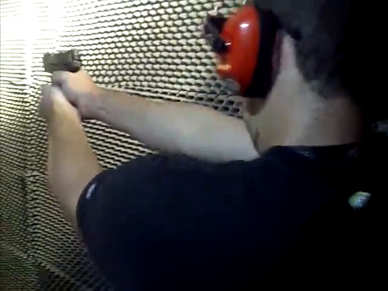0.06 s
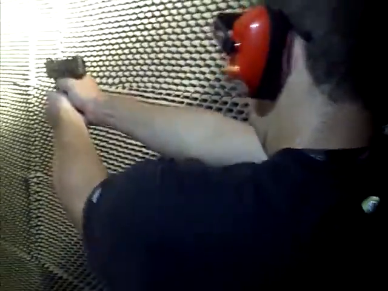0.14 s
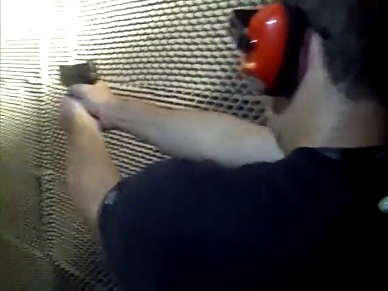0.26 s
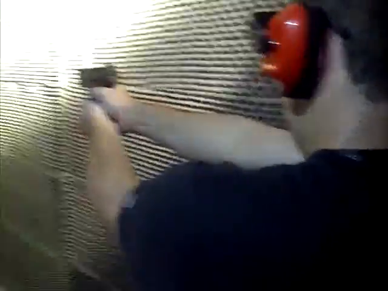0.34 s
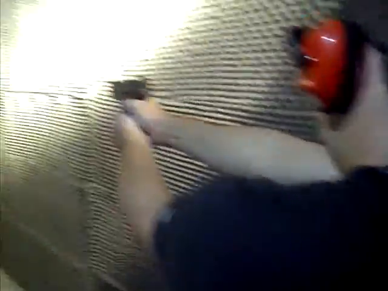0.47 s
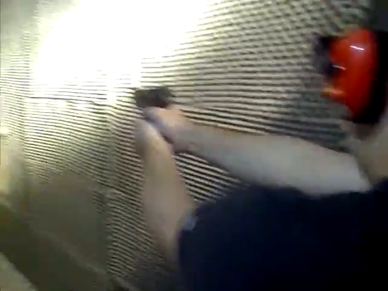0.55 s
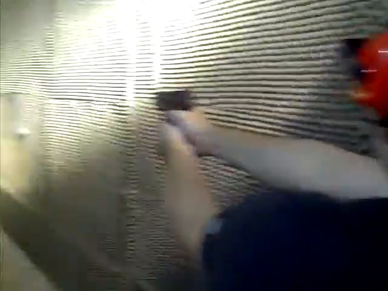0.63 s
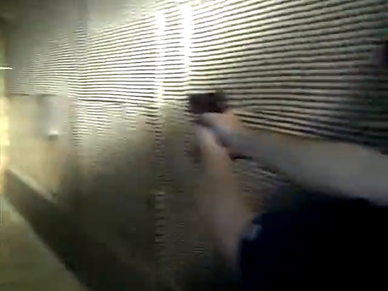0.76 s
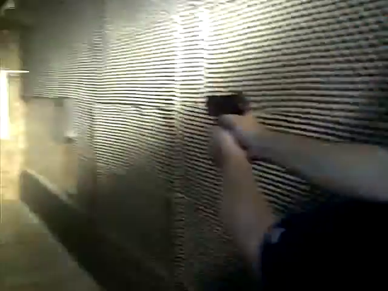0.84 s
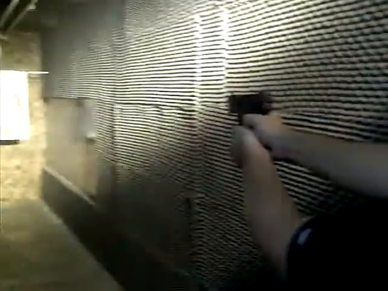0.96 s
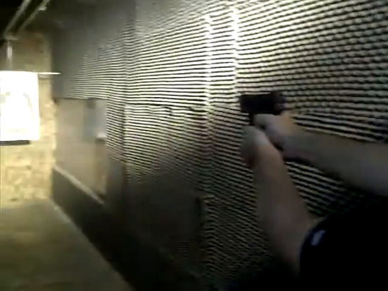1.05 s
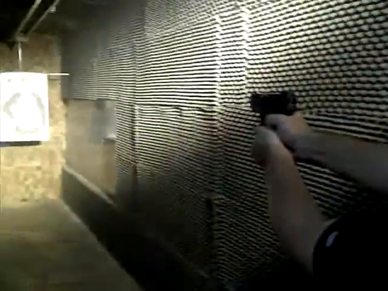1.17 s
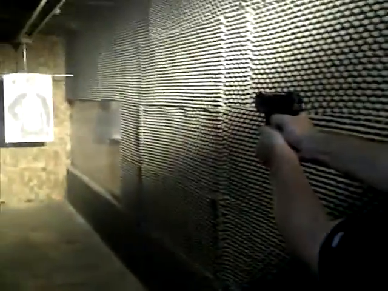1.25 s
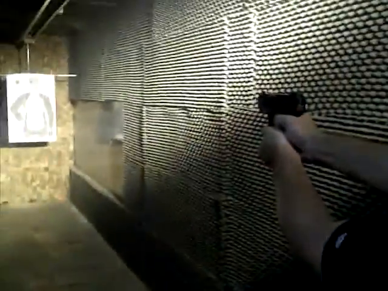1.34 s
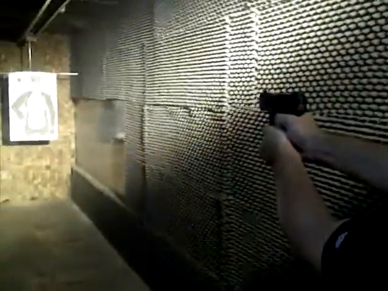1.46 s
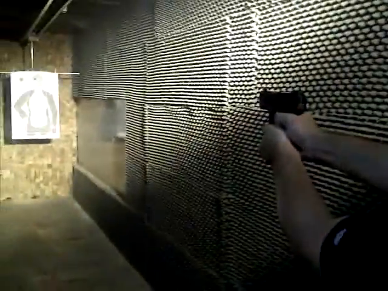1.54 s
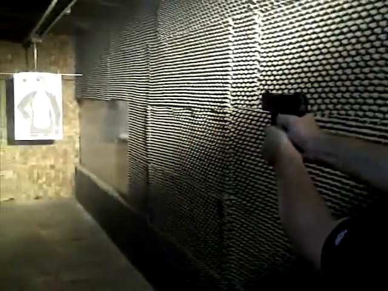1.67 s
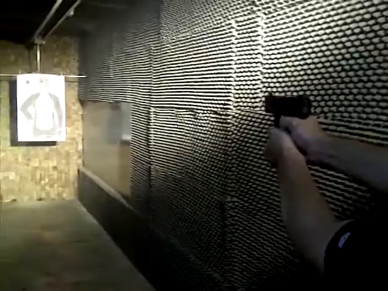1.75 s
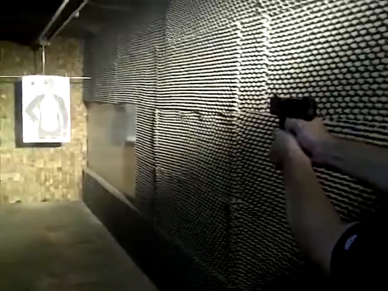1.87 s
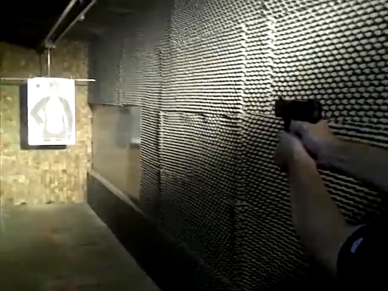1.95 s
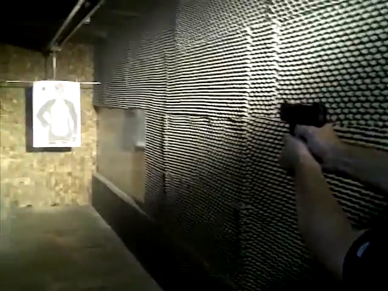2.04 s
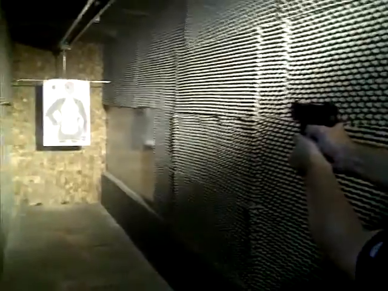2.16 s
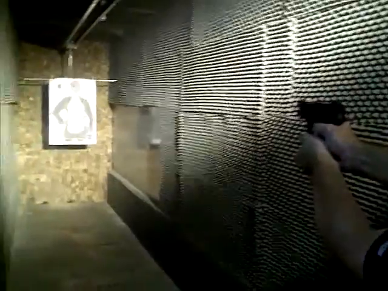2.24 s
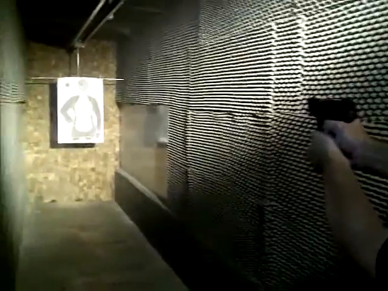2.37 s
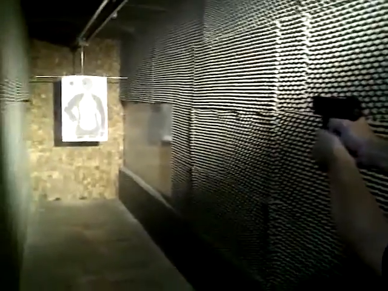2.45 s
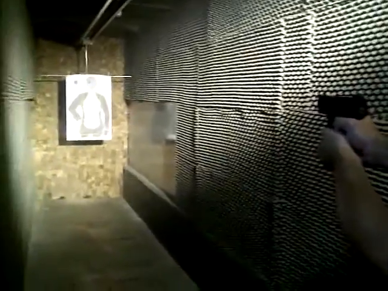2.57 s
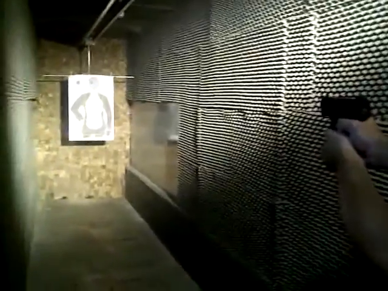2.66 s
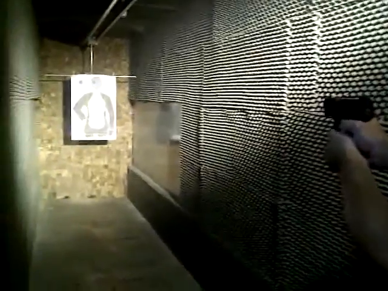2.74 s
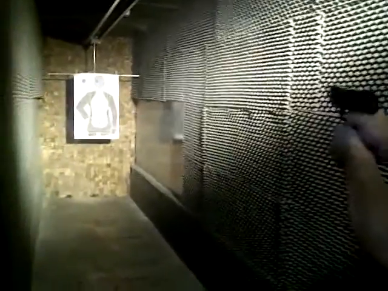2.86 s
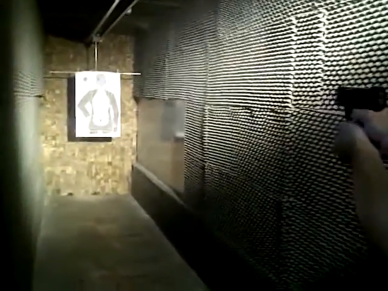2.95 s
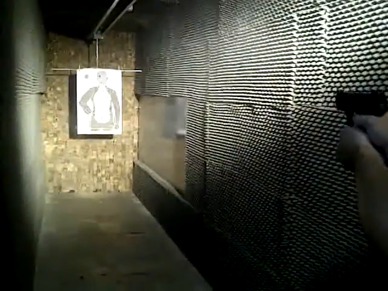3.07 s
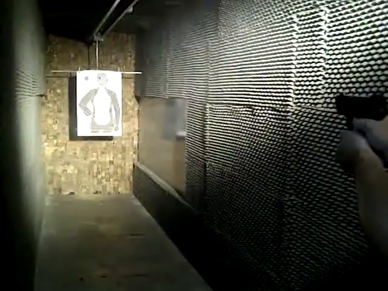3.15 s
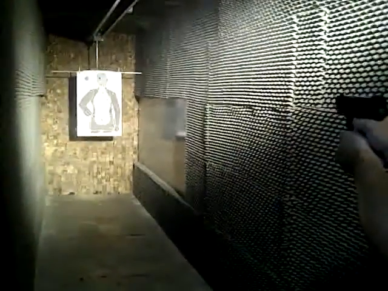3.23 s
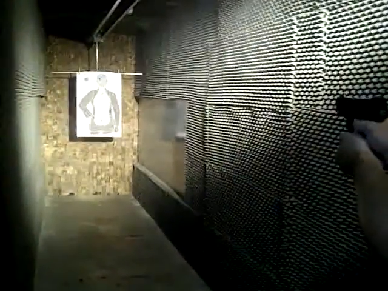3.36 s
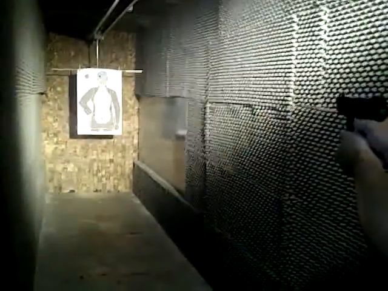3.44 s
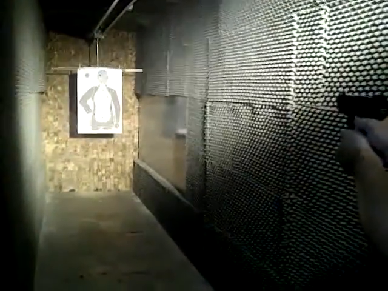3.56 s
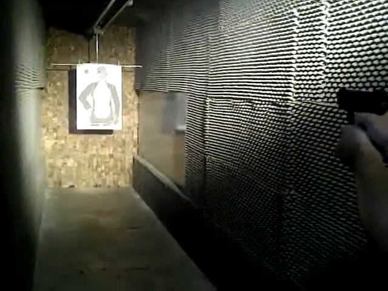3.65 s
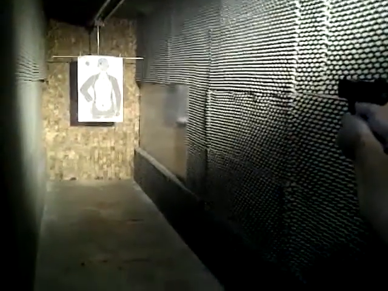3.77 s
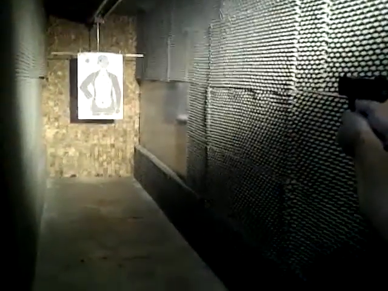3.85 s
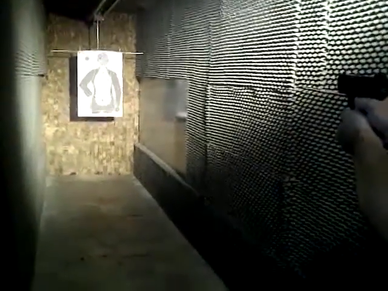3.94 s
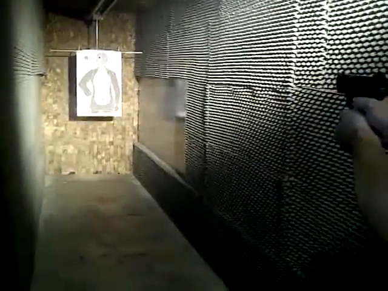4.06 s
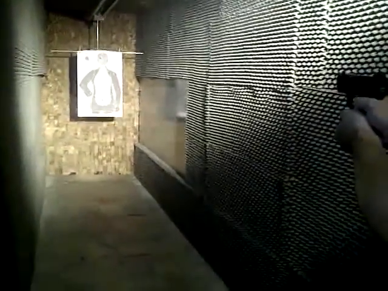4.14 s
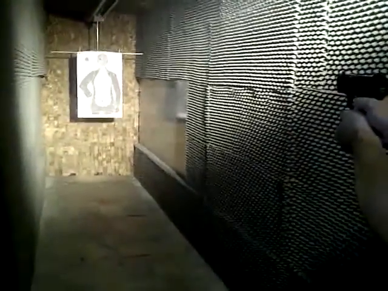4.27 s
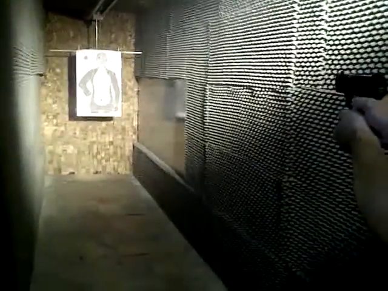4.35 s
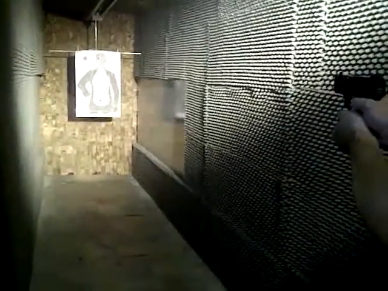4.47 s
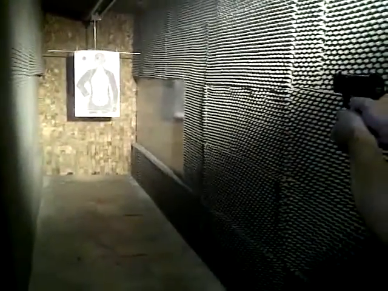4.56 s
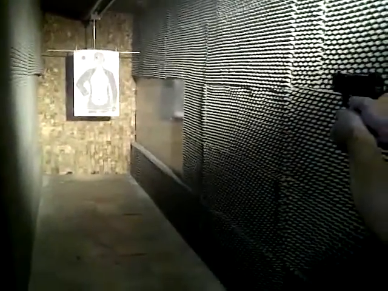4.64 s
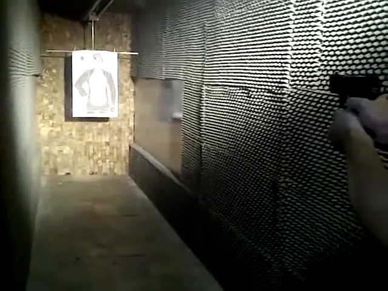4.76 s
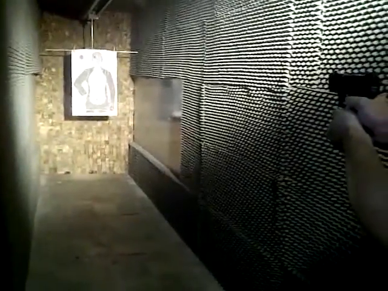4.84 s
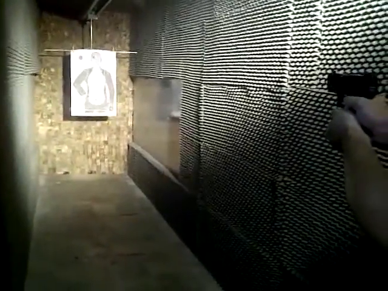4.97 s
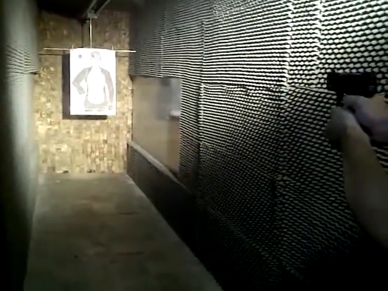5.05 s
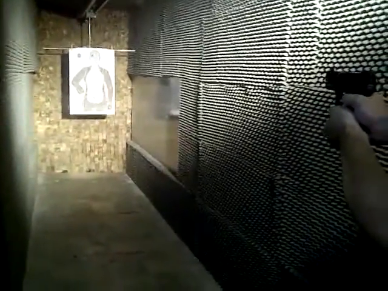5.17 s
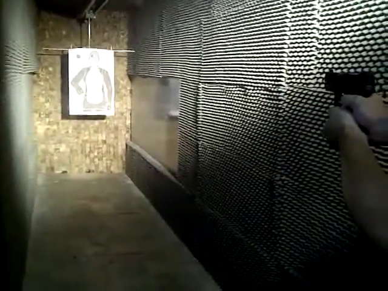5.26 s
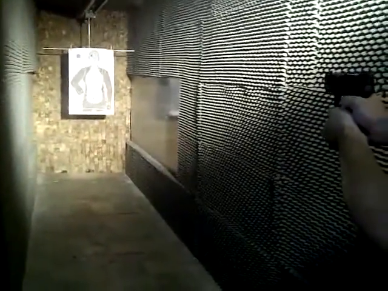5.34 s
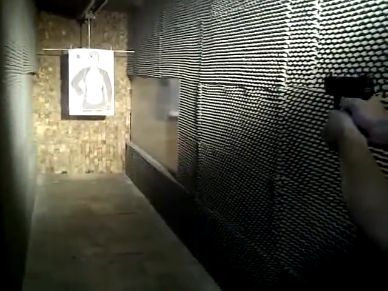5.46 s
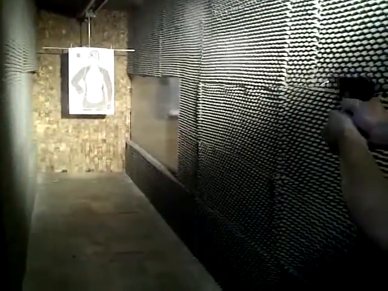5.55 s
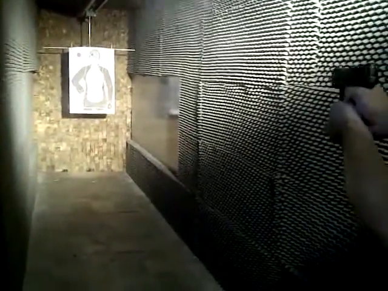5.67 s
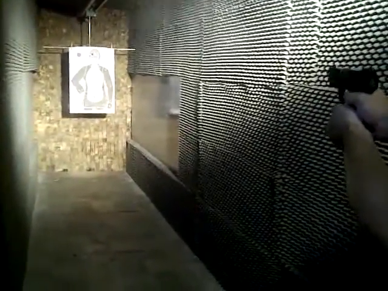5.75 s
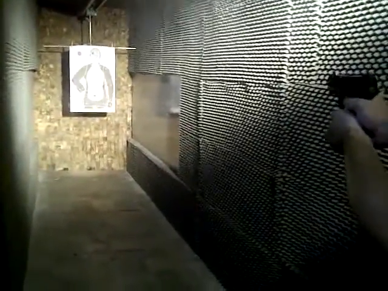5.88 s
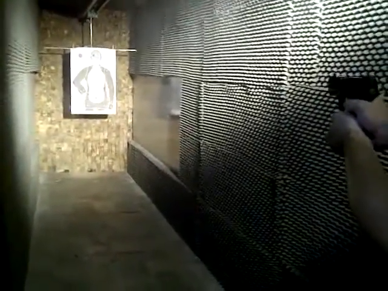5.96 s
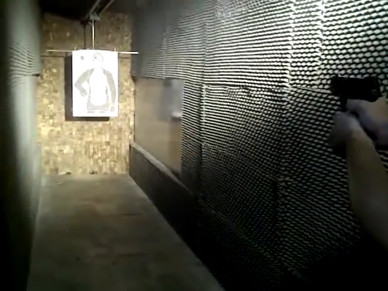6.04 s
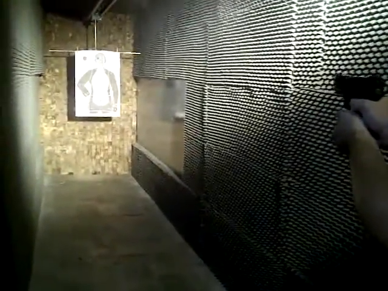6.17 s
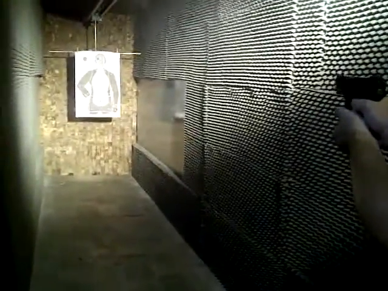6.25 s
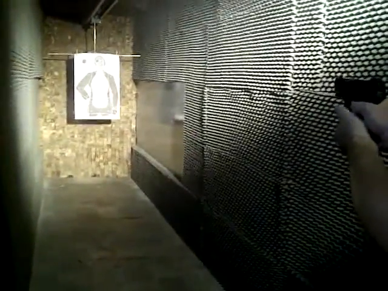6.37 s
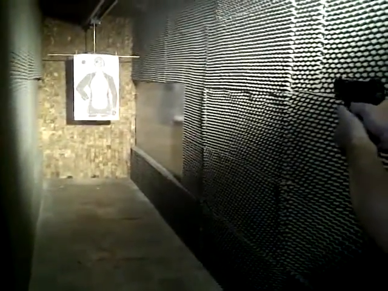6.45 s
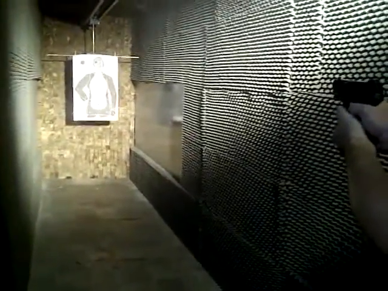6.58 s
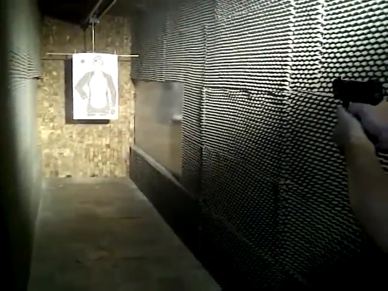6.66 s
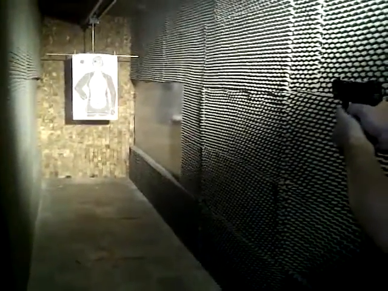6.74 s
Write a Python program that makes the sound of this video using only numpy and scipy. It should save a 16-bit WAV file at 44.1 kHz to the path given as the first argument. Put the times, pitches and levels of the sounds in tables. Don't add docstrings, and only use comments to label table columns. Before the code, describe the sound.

Over a steady low fan rush, a pistol cracks three times close by, with clustered echoes, faint steel ringing and tinkling spent casings.

```python
import sys
import numpy as np
from scipy import signal
from scipy.fft import rfft, irfft
from scipy.io import wavfile
from scipy.ndimage import uniform_filter1d, minimum_filter1d

SR = 44100
rng = np.random.default_rng(int(sys.argv[2]) if len(sys.argv) > 2 else 0)


def gain_from_db(level_db):
    decades = np.asarray(level_db, float) / 20
    return 10 ** decades


def dump(signal):
    limited = np.clip(np.atleast_2d(signal).T, -1, 1)
    pcm = np.round(limited * 32767).astype(np.int16)
    wavfile.write(sys.argv[1], SR, pcm)


N = 300321

# (frequency [Hz], density [dB per Hz])
FAN_SPECTRUM = [(12, -62), (20, -19.5), (101, -9), (139, -2), (245, -14), (363, -7.5), (639, -13),
                (688, -11.5), (837, -10.5), (924, -13), (1370, -18), (2530, -30), (3840, -28.5),
                (7100, -53.5), (9230, -94.5), (15600, -120)]
# (frequency [Hz], width [Hz], height [dB])
DUCT_TONES = [(152, 26, 7), (474, 5.4, 9), (552, 25, 9), (702.6, 40, 11), (847.6, 36, 12), (1390, 11, 10),
              (1800, 63, 4.5), (6530, 2000, 6.5)]
FAN_DB, STIR_DB, STIR_S = -47.5, 2.25, .45

# (time [s], level [dB], treble [dB])
SHOTS = [
    (0.0706, -1.5, 0),
    (2.9082, -1.5, -5),
    (5.6636, -0.5, -6.5),
]
SAME_SHARE = 0.57

# (delay [s], level [dB], length [s], bright edge relative
# to body [dB])
BUNCHES = [
    (.0006, -12.5, 0.006, 2),
    (.003, -17.5, .007, -10),
    (0.01, -15, 0.015, -9.5),
    (.033, -13, 0.019, -3.5),
    (0.075, -23, 0.027, -4.5),
    (0.124, -38.5, 0.022, -16),
]
BODY_HZ, BODY_WIDTH_HZ, BODY_T60_S = 1050, 1550, 0.051
NARROWS_S = 0.032
EDGE_HZ, EDGE_WIDTH_HZ, EDGE_T60_S = 2300, 3500, 0.012
EDGE_SHARE, DULLS_S = 0.72, 0.1
RISE_S, SPREADS = .001, 0.055

# (delay [s], level [dB], frequency [Hz], width [Hz], t60 [s])
HOLLOWS = [
    (0.02, -8.5, 442, 45, 0.0094),
    (.045, -14.5, 398, 244, 0.067),
    (0.049, -11.5, 636, 207, .042),
]
HOLLOW_S = .012
# (start [s], level [dB], centre [Hz], t60 [s])
TAILS = [
    (0.0041, -23, 290, 0.23),
    (0.082, -40, 223, 0.64),
    (0.11, -39, 1100, .5),
    (0.022, -41.5, 1750, 1),
    (.1, -51, 2500, 0.36),
    (.094, -60.5, 4800, 0.18),
]
TAIL_HOLD_S, TAIL_WIDTH = 0.043, 0.67

# (frequency [Hz], level [dB], start [s], fade start [s], t60 [s])
BOOM_MODES = [(35, -50, .05, 0.32, 0.54), (65.6, -37, 0.11, 0.24, 0.24), (68.56, -42, 0.11, 0.27, 1),
              (84.4, -34.5, 0.01, 0.22, 0.078), (94.9, -30.5, 0.027, 0.19, 0.48),
              (123, -39, 0.0067, 0.11, 0.61)]
BOOM_FILL_CYCLES = 3.9
BOOM_CREST_S = .141

# (frequency [Hz], level [dB], t60 [s])
TRAP_MODES = [(1437.3, -46, 3.8), (1451.5, -48.5, 3.4), (1628.4, -48.5, 1.6), (3092, -62, 1.6),
              (3107.5, -64, 1.6), (1034, -54, .5), (1424, -57, 2), (1523, -60, 1.2), (1576, -58, 1.4),
              (1793, -55, .7), (1884, -54, .8), (1960, -52, .5), (2010, -56, .6), (2223, -63, .8),
              (2358, -61, .6)]
HIT_DELAYS = [.1574, .1485, .1515]
OFF_CENTRE = [-6.5, .5, -1.5]
TRAP_TICK_DB = -46.5
RING_START_S, RING_SWELL_S = .145, .0155
RING_PHASE_S = .357

# (time [s], peak [dB], ring [Hz])
PINGS = [(1.1052, -35, 5100), (1.1072, -39.5, 6000), (1.508, -23.5, 4760), (1.6458, -39, 4900),
         (1.6658, -46, 5600), (1.677, -51, 4840), (1.754, -51, 4088), (3.742, -53, 4670),
         (3.8606, -51, 5200), (4.2173, -53, 5000), (6.537, -17, 4860)]
PING_RISE_S, PING_T60_S = .0006, 0.0069
PING_SPLIT = 0.066
# (time [s], peak [dB], centre [Hz], length [s], fizz [dB])
RATTLES = [
    (1.106, -53, 2600, .005, -1),
    (3.9590, -27.5, 1490, .0067, -8.5),
    (4.407, -36.5, 1800, 0.0053, -5),
    (4.602, -43.5, 2000, .006, -6.5),
    (4.6867, -54, 1990, .0015, -5),
    (4.7235, -50, 2000, 0.0049, -8),
    (6.581, -70.5, 2500, 0.014, 9),
]
RATTLE_WIDTH, FIZZ_HZ, FIZZ_WIDTH_HZ = 0.56, 4300, 2350
FIRST_CONTACT_DB = 1

MASK_DB = -42


def band(x, hz, width_hz, order=2):
    low = np.sqrt(hz ** 2 + width_hz ** 2 / 4) - width_hz / 2
    high = min(low + width_hz, .45 * SR)
    return signal.sosfilt(signal.butter(order, [low, high], "band", fs=SR, output="sos"), x)


def unit(x):
    return x / np.sqrt(np.mean(x ** 2))


def noise_band(size, hz, width_hz, order=2):
    return unit(band(rng.standard_normal(size), hz, width_hz, order))


def shape(t, start, rise, hold, t60):
    up = np.clip((t - start) / max(rise, 1 / SR), 0, 1)
    fall = gain_from_db(-60 * np.maximum(t - start - hold, 0) / t60)
    return np.sin(np.pi / 2 * up) ** 2 * fall


def add(out, x, s):
    i = int(s * SR)
    out[i:i + len(x)] += x[:N - i]


def walk(rate):
    k = int(SR / rate)
    steps = np.repeat(rng.standard_normal(N // k + 1), k)
    return unit(uniform_filter1d(uniform_filter1d(steps, k), k)[:N])


def fan():
    f = np.maximum(np.fft.rfftfreq(N, 1 / SR), 1)
    curve_hz, curve_db = np.transpose(FAN_SPECTRUM)
    db = np.interp(np.log(f), np.log(curve_hz), curve_db)
    for hz, width_hz, tone_db in DUCT_TONES:
        db = db + tone_db / (1 + (2 * (f - hz) / width_hz) ** 2)
    air = gain_from_db(db) * rfft(rng.standard_normal(N))
    rush = np.zeros(N)
    for step in range(20):
        share = np.clip(1 - abs(2 * np.log2(f / 16) - step), 0, 1)
        rush += gain_from_db(.8 * walk(8.2)) * irfft(air * share, N)
    t = np.arange(N) / SR
    stir = sum((t > s) * np.exp(-np.maximum(t - s, 0) / STIR_S) for s, _, _ in SHOTS)
    return unit(rush) * gain_from_db(FAN_DB + STIR_DB * stir + .5 * walk(0.99))


def blast(t):
    push = -1.3 * np.exp(-((t - .0003) / 0.00023) ** 2)
    rebound = 0.17 * np.exp(-((t - .001) / 0.00073) ** 2)
    return push + rebound


def reflections(size):
    return unit(rng.standard_normal(size) * (rng.random(size) < .12))


def echoes(t, scatter, treble_db):
    def part(delay, db, length, t60, hz, width_hz):
        env = shape(t, delay, RISE_S + SPREADS * delay, length, t60)
        bunch = env * band(scatter, hz, width_hz)
        even = np.sqrt(np.sum(env ** 2) / np.sum(bunch ** 2))
        return gain_from_db(db + treble_db * np.clip(hz / 3000, 0, 1)) * bunch * even

    out = np.zeros(len(t))
    for delay, db, length, edge_db in BUNCHES:
        out += part(delay, db, length, BODY_T60_S, BODY_HZ, BODY_WIDTH_HZ / (1 + delay / NARROWS_S))
        dull = 1 + delay / DULLS_S
        out += part(delay, db + edge_db, EDGE_SHARE * length, EDGE_T60_S, EDGE_HZ / dull, EDGE_WIDTH_HZ / dull)
    for delay, db, hz, width_hz, t60 in HOLLOWS:
        out += part(delay, db, HOLLOW_S, t60, hz, width_hz)
    for start, db, hz, t60 in TAILS:
        out += part(start, db, TAIL_HOLD_S, t60, hz, TAIL_WIDTH * hz)
    return out


def boom(t):
    out = np.zeros(len(t))
    for hz, db, start, fade, t60 in BOOM_MODES:
        swell = shape(t, start, BOOM_FILL_CYCLES / hz, fade - start, t60)
        out += np.sqrt(2) * gain_from_db(db) * swell * np.cos(2 * np.pi * hz * (t - BOOM_CREST_S))
    return out


def trap(t, hit_s, strength_db):
    tick = shape(t, hit_s, .0003, 0.0019, 0.005) * noise_band(len(t), 3720, 3500)
    out = gain_from_db(TRAP_TICK_DB) * tick
    lesser = np.arange(len(TRAP_MODES)) > 4
    zeros_s = RING_PHASE_S + rng.random(len(TRAP_MODES)) * lesser
    for (hz, db, t60), gain_db, zero_s in zip(TRAP_MODES, strength_db, zeros_s):
        swell = shape(t, RING_START_S, RING_SWELL_S, 0, t60)
        out += np.sqrt(2) * gain_from_db(db + gain_db) * swell * np.sin(2 * np.pi * hz * (t - zero_s))
    return out


def pistol():
    out, t = np.zeros(N), np.arange(2 * SR) / SR
    pattern = reflections(len(t))
    for (s, db, treble_db), hit_s, off_db in zip(SHOTS, HIT_DELAYS, OFF_CENTRE):
        strength_db = rng.standard_normal(len(TRAP_MODES))
        strength_db[1:3] += off_db
        scatter = np.sqrt(SAME_SHARE) * pattern + np.sqrt(1 - SAME_SHARE) * reflections(len(t))
        crack = np.tanh(2.025 * gain_from_db(db) * echoes(t, scatter, treble_db)) / 2.09
        add(out, blast(t) + crack + boom(t) + trap(t, hit_s, strength_db), s)
    return out


def case_ping(t, hz):
    beat = np.cos(2 * np.pi * PING_SPLIT * hz * (t - PING_RISE_S))
    ping = shape(t, 0, PING_RISE_S, PING_RISE_S, PING_T60_S) * np.sin(2 * np.pi * hz * t) * beat
    knock = gain_from_db(-21) * shape(t, 0, 0.0003, 0.00023, 0.01) * noise_band(len(t), 1800, 2000)
    smear = gain_from_db(-24.5) * shape(t, 0.0006, 0.001, 0.003, 0.05) * noise_band(len(t), 1.03 * hz, 1500, order=3)
    return ping + knock + smear


def case_rattle(t, hz, length, fizz_db):
    first = gain_from_db(FIRST_CONTACT_DB) * shape(t, 0, 0.00033, 0.00063, 0.012)
    rattling = shape(t, 0, 0.00066, length, 0.03)
    tail = gain_from_db(-17) * shape(t, 0, 0.0019, length, 0.15)
    contacts = reflections(len(t))
    ring = unit(band(contacts, hz, RATTLE_WIDTH * hz))
    fizz = gain_from_db(fizz_db) * unit(band(contacts, FIZZ_HZ, FIZZ_WIDTH_HZ))
    return gain_from_db(-9.5) * (first + rattling + tail) * (ring + fizz)


def cases():
    out, t = np.zeros(N), np.arange(SR // 8) / SR
    for s, db, hz in PINGS:
        add(out, gain_from_db(db) * case_ping(t, hz), s)
    for s, db, hz, length, fizz_db in RATTLES:
        add(out, gain_from_db(db) * case_rattle(t, hz, length, fizz_db), s)
    return out


def scene():
    return (fan() + pistol() + cases())[None]


def mask_treble(x):
    f, _, z = signal.stft(x, SR, nperseg=1024)
    power = np.abs(z) ** 2
    for low in np.arange(3500, 7700, 600):
        rows = (f >= low) & (f < low + 600)
        limit_db = MASK_DB + 2.5 * rng.standard_normal(z.shape[1])
        limit = power.sum(axis=0) * gain_from_db(2 * limit_db)
        z[rows] *= power[rows].sum(axis=0) > limit
    return signal.istft(z, SR)[1][:N]


def roll_off(x):
    return signal.sosfilt(signal.butter(12, 8900, fs=SR, output="sos"), x)


def record(dry):
    ahead = -minimum_filter1d(-np.abs(dry), size=450, origin=-224)
    hiss = gain_from_db(-44.5) * ahead * noise_band(N, 1300, 3000, order=1)
    steep = signal.ellip(4, .5, 24, 6900, fs=SR, output="sos")
    x = signal.sosfilt(steep, dry + hiss)
    mix = np.clip(mask_treble(x[0])[None], -.708, .708)
    return roll_off(mix)


dry = scene()
out = record(dry)
dump(out)
```